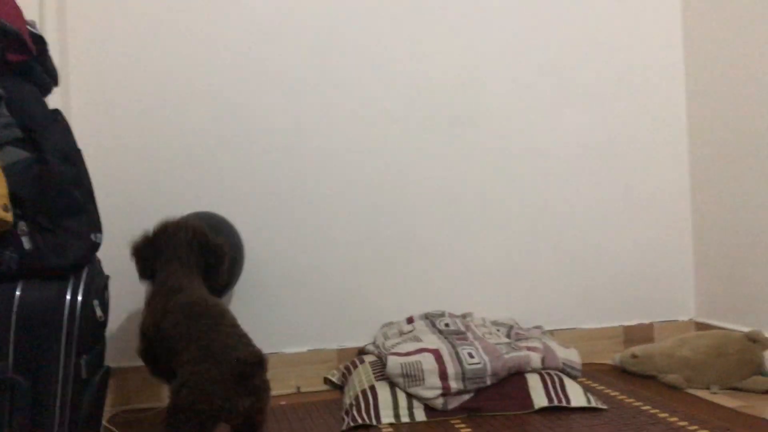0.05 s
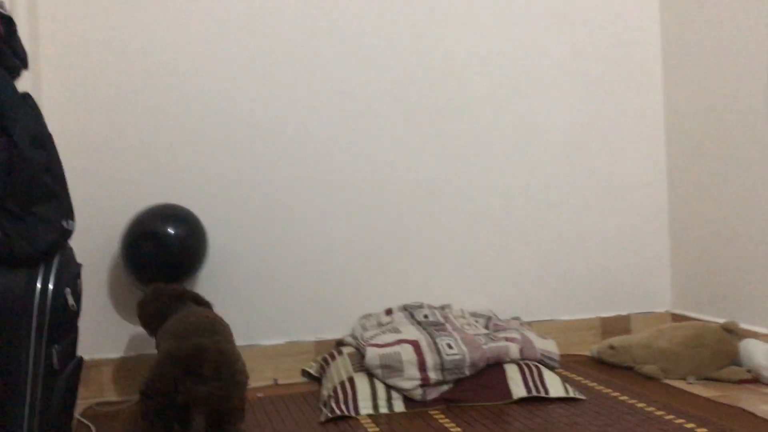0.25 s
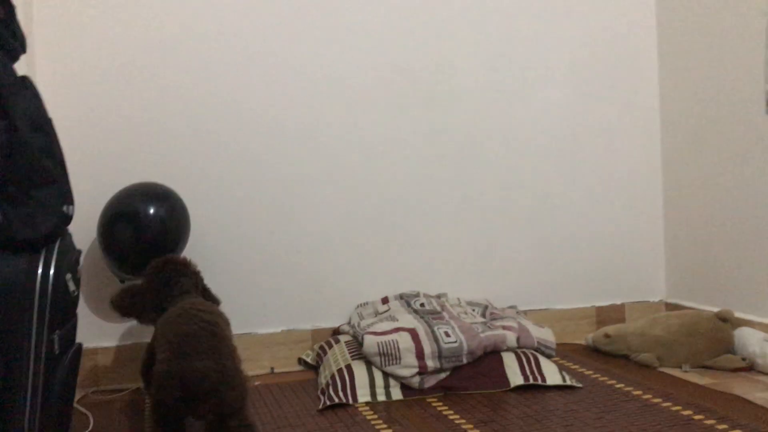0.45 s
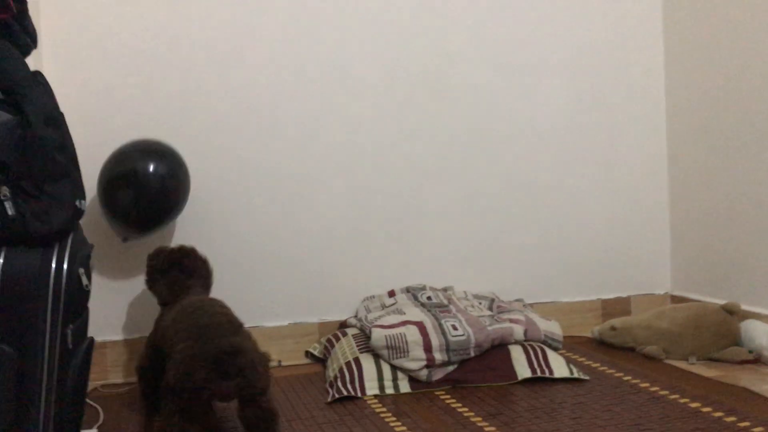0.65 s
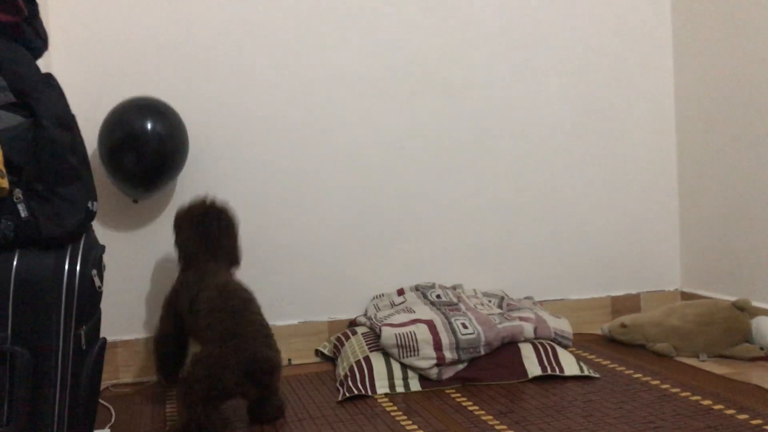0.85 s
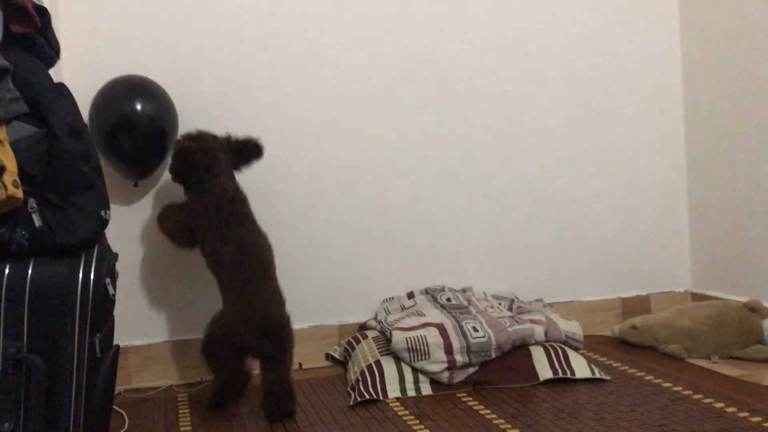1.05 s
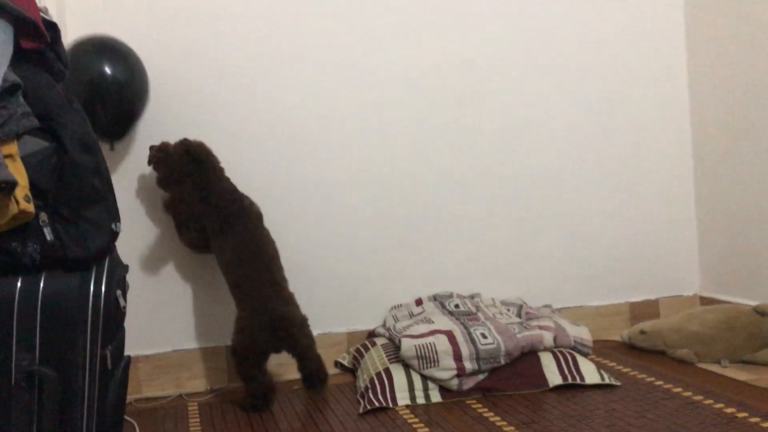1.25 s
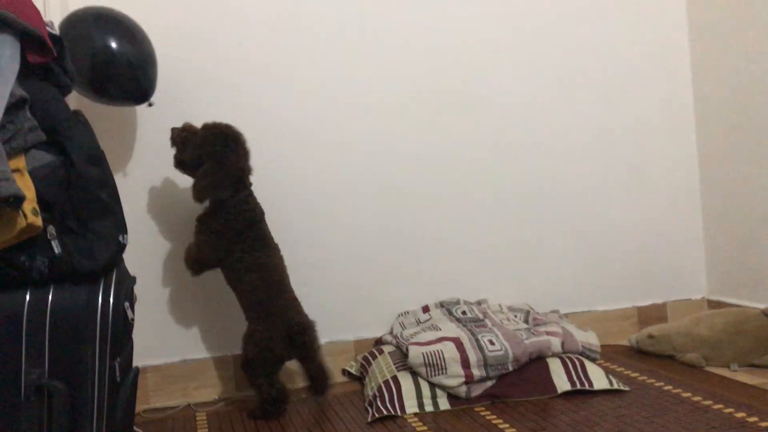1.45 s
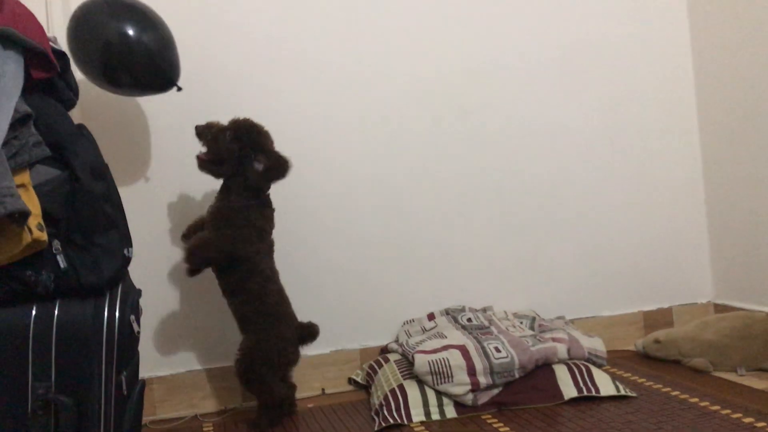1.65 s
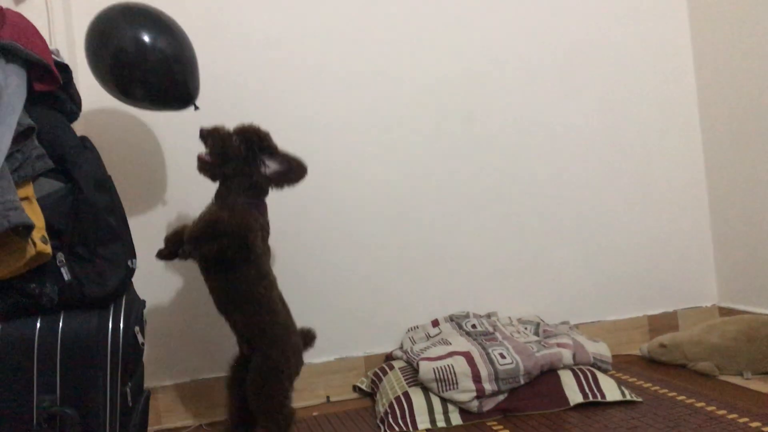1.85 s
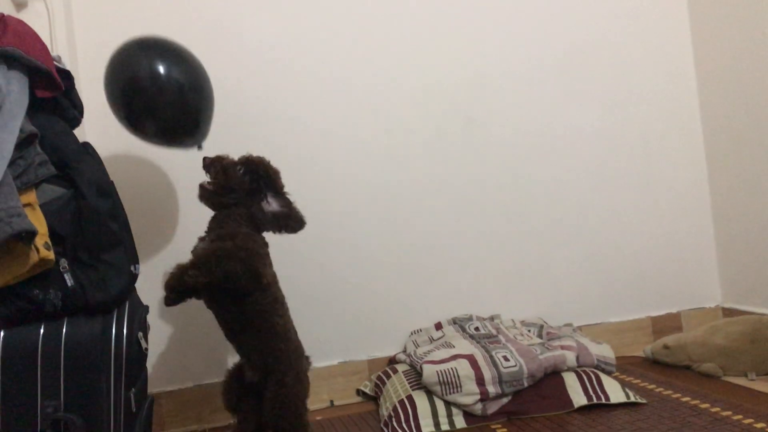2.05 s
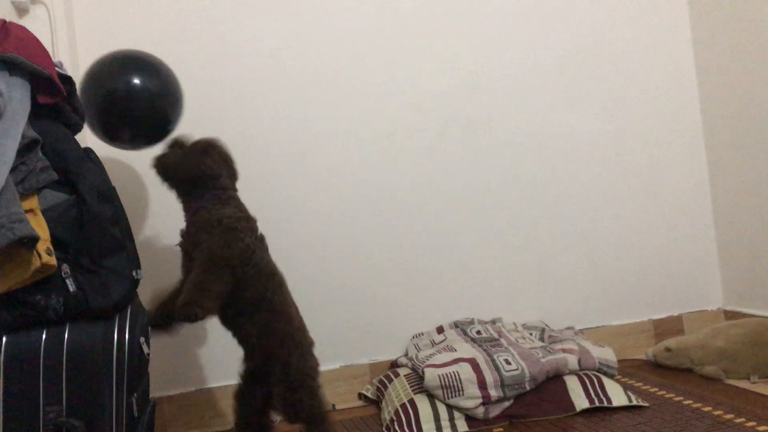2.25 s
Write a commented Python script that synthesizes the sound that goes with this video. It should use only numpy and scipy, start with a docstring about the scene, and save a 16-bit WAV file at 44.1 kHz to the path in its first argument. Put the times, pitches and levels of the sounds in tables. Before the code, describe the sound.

Three high, hoarse barks and a short whine from a small dog jumping indoors.

```python
"""A bare-walled bedroom, the microphone in the room with a small dog jumping at a balloon, over a low hum.
Paws scuff and knock as the first of two shrill barks rings off the near walls; each slides up to a
clear note, then falls hoarsely as the vocal folds turn rough. A short whine follows, and at 1.2 s a
third bark. Faint whistles come and go, and paws tap and scuff through the last half second.
The recorder's gain control ducks at the barks and creeps back."""
import sys
import numpy as np
from scipy import signal
from scipy.fft import rfft, irfft, next_fast_len
from scipy.io import wavfile
from scipy.ndimage import uniform_filter1d, minimum_filter1d

SR = 44100
rng = np.random.default_rng(int(sys.argv[2]) if len(sys.argv) > 2 else 0)


def materialize(psi):
    """Save the field psi as 16-bit PCM at rate SR to the path in sys.argv[1].

    A 1-D psi becomes a single channel; in a 2-D psi each row is a channel.
    """
    bounded = np.clip(np.atleast_2d(psi).T, -1, 1)
    quanta = np.round(bounded * 32767).astype(np.int16)
    wavfile.write(sys.argv[1], SR, quanta)


N = 101429

# the dog's calls at the vocal folds
# (time [s], pitch [Hz], level [dB], roughness [0-1], overtone boost [dB])
FIRST_BARK = [(.209, 590, -18, 0.18, -14), (.224, 658.7, -5, 0.23, -1), (.235, 802.2, -1, 0.35, 9.5),
              (.241, 1083, -4, 0.1, 7.5), (.259, 1110, 5, .04, -22.5), (.267, 1076, 4.5, 1, -1),
              (.276, 1089, 14.5, 0.31, -12), (.3, 978.1, 6, 0.74, -11), (.328, 879.5, 9, .85, -10),
              (.338, 626.4, 6, 0.62, 33), (.362, 622, 7, 0.34, 33.5), (.385, 607, -12, 0.83, 24)]
SECOND_BARK = [(.484, 773.8, -31, 0.11, 6), (.522, 787.5, -12, 0.3, 6), (.55, 898.9, -0.5, 0.16, 22.5),
               (.563, 1051, -1, 0.061, -1), (.581, 1083, 5.5, .3, -2), (.597, 1060, 6.5, 0.85, 2.5),
               (.626, 1102, 8.5, 0.54, 8.5), (.642, 1116, -3, 0.5, 10), (.692, 920.2, 0, 0.85, 17),
               (.76, 946, -11, 0.37, -13)]
SHORT_WHINE = [(.849, 725, -19, .45, -8), (.876, 765, -12, .25, 15), (0.901, 747.5, -16.5, 0.21, 2.5),
               (.925, 690, -12, 0.29, 3)]
THIRD_BARK = [(1.206, 939.6, -16.5, 0.16, 15), (1.233, 915, -5.5, 0.17, 29.5),
              (1.241, 1094, 3, 0.036, -7.5), (1.26, 1096, 8.5, 0.022, -6.5), (1.275, 1125, 9, .22, 5),
              (1.298, 1096, 5.5, 0.99, 9.5), (1.324, 1116, 1.5, 0.44, 19), (1.346, 1102, -6, 0.13, 10),
              (1.36, 967, -2, 0.97, 8), (1.39, 829.6, -3, 0.76, -5), (1.45, 704, -18.5, 0.86, -9)]
# resonances the shape of the mouth adds for a moment in each bark
# (peak time [s], half-length [s], centre [Hz], width [Hz], gain [dB])
FIRST_MOUTH = [(0.328, 0.027, 1264, 240, -9), (0.345, 0.029, 2480, 47, 1.5),
               (0.252, 0.0173, 3320, 200, 8.5)]
SECOND_MOUTH = [(0.66, 0.18, 969, 72, -5), (.61, .06, 1580, 220, -2), (0.702, 0.052, 2550, 360, 1)]
THIRD_MOUTH = [(1.41, 0.043, 670, 160, 8), (1.3, 0.017, 1580, 280, -6), (1.51, 0.13, 2330, 170, 6),
               (1.335, 0.036, 6650, 160, 16.5)]
# resonances of the throat (frequency [Hz], gain [dB])
THROAT_RESPONSE = [(200, -35), (500, -25.5), (700, -14.5), (900, -5), (1080, -2), (1350, 1), (1650, 0.5),
                   (1950, -7.5), (2250, 0), (2700, -2), (3350, -3.5), (4050, -19.5), (4900, -24),
                   (5500, -13.5), (6000, -19.5), (6650, -13), (9000, -18.5), (12000, -22.5), (16000, -43)]
def dog(t):
    """The dog as heard at the muzzle: three barks and a whine, all through the same throat."""
    calls = mouth(t, vocal_folds(t, FIRST_BARK), FIRST_MOUTH)
    calls += mouth(t, vocal_folds(t, SECOND_BARK), SECOND_MOUTH)
    calls += vocal_folds(t, SHORT_WHINE)
    calls += mouth(t, vocal_folds(t, THIRD_BARK), THIRD_MOUTH)
    return colour(calls, THROAT_RESPONSE)


HARMONIC_DB_PER_OCT, AIR_DB, CLEAR_NOTE_AIR = -11.5, -4.5, 0.13
CLEAN_JITTER, ROUGH_JITTER, SHIMMER = 0.0095, 0.0614, 0.48
def vocal_folds(t, call):
    """Smooth folds give clean harmonics; roughness adds jitter, period doubling and pulsed air."""
    times, *columns = np.array(call).T
    pitch, db, rough, overtones_db = (np.interp(t, times, column) for column in columns)
    jitter = (CLEAN_JITTER + ROUGH_JITTER * rough) * wander(rate_hz=420)
    phase = 2 * np.pi * np.cumsum(pitch * (1 + jitter)) / SR
    partial = lambda k: undb(HARMONIC_DB_PER_OCT * np.log2(k)) * np.sin(k * phase)
    clean = partial(1) + undb(overtones_db) * sum(partial(k) for k in range(2, 13))
    clean /= np.hypot(1, undb(overtones_db + HARMONIC_DB_PER_OCT))  # brighter, yet about as loud
    growl = sum(partial(k + .5) for k in range(1, 7))  # halfway between the harmonics
    air = noise([(100, -12), (600, -8), (1000, 0), (16000, -10)])
    air *= 1 + np.cos(phase / 2)  # a puff every second cycle
    folds = clean * (1 - .6 * rough) + rough * growl
    folds *= 1 + SHIMMER * rough * wander(rate_hz=260)
    breath = undb(AIR_DB) * (rough ** 2 + CLEAR_NOTE_AIR) * air
    gate = np.interp(t, [times[0] - .003, times[0], times[-1], times[-1] + .01], [0, 1, 1, 0])
    return gate * undb(db) * (folds + breath)


def mouth(t, voice, resonances):
    """The moving mouth adds resonances that each swell and fade."""
    return voice + sum(undb(db) * ring(voice * np.exp(-((t - at) / length) ** 2), hz, width)
                       for at, length, hz, width, db in resonances)


# paws and balloon brushing wall and bags (time [s], level [dB], attack [s], decay [s])
BRUSHES = [(.2, -41.5, .004, .09), (1.749, -34, 0.0085, 0.0047), (1.808, -39, 0.0039, .016),
           (1.968, -38.5, 0.021, 0.032), (2.29, -45, 0.014, 0.031)]
# sharp ticks: claws striking, and at 0.264 s a crack in the rough first bark (time [s], level [dB])
SHARP_TICKS = [(.196, -29), (0.264, -23.5), (0.872, -33), (1.967, -15.5)]
# paws landing on the mat (time [s], level [dB])
LANDINGS = [(0.273, -31), (1.13, -38.5), (1.254, -38), (1.965, -35.5), (2.037, -41)]
# spectra of the brushes and ticks, and of the landings (frequency [Hz], level [dB])
BRUSH_SPECTRUM = [(300, -15), (1500, 3), (3000, -2), (6000, 0), (9000, 0), (14000, 2), (16000, -6)]
LANDING_SPECTRUM = [(40, -22), (85, 0), (130, -10.5), (200, -6), (350, -10.5), (700, -24), (3000, -47)]
def paws(t):
    """Around the dog: grainy scuffs, sharp ticks, soft landings and a knock."""
    scuffs = sum(undb(db) * burst(t, at, attack, decay) for at, db, attack, decay in BRUSHES)
    scuffs *= undb(3.76 * wander(rate_hz=400))  # the grain
    ticks = sum(undb(db) * strike(t, at, decay_s=0.00049) for at, db in SHARP_TICKS)
    thumps = sum(undb(db) * strike(t, at, decay_s=0.029) for at, db in LANDINGS)
    return knock(t) + (scuffs + ticks) * noise(BRUSH_SPECTRUM) + thumps * noise(LANDING_SPECTRUM)


def knock(t, hz=420, width_hz=350):
    """One hollow knock under the first bark, probably a paw on the balloon."""
    body = ring(rng.standard_normal(N), hz, width_hz)
    body = unit(ring(body, hz, width_hz))
    return undb(-10) * strike(t, at=.272, decay_s=.004) * body


# faint, thin whistles (peak time [s], pitch [Hz], level [dB], decay [s])
NOSE_WHISTLES = [(.56, 14790, -35, 0.074), (1.101, 4470, -43.5, 0.043), (1.13, 14500, -38, 0.035),
                 (1.55, 10300, -49, 0.089), (1.7, 14790, -41, 0.025)]
def whistles(t):
    """Nearly pure, unsteady tones that swell and fade, probably the dog's nose."""
    return sum(undb(db) * burst(t, at, attack_s=0.014, decay_s=decay) * tone(hz, 0.0049, rate_hz=200)
               for at, hz, db, decay in NOSE_WHISTLES)


# the bedroom's reverberation (frequency [Hz], time to fall 60 dB [s])
BEDROOM_DECAY = [(150, 1), (1000, 0.73), (2300, 0.76), (5000, 0.52), (12000, 0.49)]
WALLS_DB, WALLS_DECAY_S, TAIL_DB, REFLECTION_GAP_S = -2, 0.025, -11, 0.0034
def bedroom(t, direct):
    """At the microphone: direct sound, strong echoes off near walls, a tail whose treble dies first."""
    hz, t60s = np.array(BEDROOM_DECAY).T
    spectrum = rfft(rng.standard_normal(N))
    log_hz = np.log(np.arange(len(spectrum)) * SR / N + 1)
    bands = (irfft(spectrum * np.interp(log_hz, np.log(hz), share), N) for share in np.eye(len(hz)))
    tail = sum(band * undb(-60 * t / t60) for band, t60 in zip(bands, t60s))
    walls = rng.standard_normal(N) * np.exp(-t / WALLS_DECAY_S)
    reflections = undb(WALLS_DB) * unit(walls) + undb(TAIL_DB) * unit(tail)
    response = reflections * (t > REFLECTION_GAP_S) / np.sqrt(N)
    return direct + signal.fftconvolve(direct, response)[:N]


# the room's steady noise (frequency [Hz], relative density [dB])
ROOM_SPECTRUM = [(25, -29), (42, -24), (58, -12.5), (90, -2), (130, -8), (200, -7), (400, -18),
                 (1000, -19.5), (2300, -23), (4500, -32.5), (6500, -35), (10000, -41.5), (16000, -44)]
# tones of the hum (frequency [Hz], level [dB])
HUM_TONES = [(59, -41.5), (85, -47), (145, -55), (180, -53.5), (299, -57.5)]
def room_tone():
    """The bedroom behind the dog: low rumble, faint hiss and a wavering hum."""
    hum = sum(undb(db + 1.5 * wander(rate_hz=3.91)) * unit(tone(hz, 0.013, rate_hz=5.94))
              for hz, db in HUM_TONES)
    return undb(-42.5) * noise(ROOM_SPECTRUM) + hum


def duck(x, loudness, ceiling, hold_s, db_per_s):
    """Gain drops at once to keep the loudness under the ceiling, holds, then climbs back."""
    climb_db = db_per_s * np.arange(N) / SR
    allowed_db = np.minimum(0, 20 * np.log10(ceiling / (loudness + 1e-9)))
    hold = int(hold_s * SR) + 1
    held_db = minimum_filter1d(allowed_db, hold, origin=(hold - 1) // 2, mode="nearest")
    gain_db = np.minimum.accumulate(held_db - climb_db) + climb_db
    lookahead = int(.002 * SR)
    return x * undb(uniform_filter1d(minimum_filter1d(gain_db, lookahead), lookahead))


def undb(db):
    """Decibels to gain."""
    return 10 ** (np.asarray(db) / 20)


def unit(x):
    """Scale to rms 1."""
    return x / np.sqrt(np.mean(x ** 2) + 1e-18)


def colour(x, points):
    """Causal filter through points of (frequency [Hz], gain [dB])."""
    hz, db = np.array(points, float).T
    size = 2 * next_fast_len(N)
    log_hz = np.log(np.arange(size // 2 + 1) * SR / size + 1)
    cepstrum = irfft(np.log(undb(np.interp(log_hz, np.log(hz), db))))
    cepstrum[1:size // 2] *= 2  # fold to minimum phase
    cepstrum[size // 2 + 1:] = 0
    return irfft(rfft(x, size) * np.exp(rfft(cepstrum)))[:N]


def ring(x, hz, width):
    """One resonance, gain 1 at its centre."""
    return signal.lfilter(*signal.iirpeak(hz, hz / width, fs=SR), x)


def noise(points):
    """Coloured noise of rms 1."""
    return unit(colour(rng.standard_normal(N), points))


def wander(rate_hz):
    """Random values joined by straight lines; rms 1."""
    return unit(np.interp(np.arange(N) * rate_hz / SR, np.arange(N), rng.standard_normal(N)))


def tone(hz, drift, rate_hz):
    """A sine whose pitch wanders by the fraction `drift`."""
    return np.sin(2 * np.pi * np.cumsum(hz * (1 + drift * wander(rate_hz))) / SR)


def burst(t, at, attack_s, decay_s):
    """Exponential rise to a moment, exponential fall after it."""
    return np.exp(-np.where(t < at, (at - t) / attack_s, (t - at) / decay_s))


def strike(t, at, decay_s):
    """A burst that rises ten times faster than it falls."""
    return burst(t, at, decay_s / 10, decay_s)


def scene():
    """One microphone: dog and paws with the room's echo, room tone and dry whistles."""
    t = np.arange(N) / SR
    return (bedroom(t, dog(t) + paws(t)) + room_tone() + whistles(t))[None]


RMS_WINDOW_S, TOP_HZ = 0.0071, 15900
def record(dry):
    """Behind the microphone: slow-recovering gain control, a fast limiter and a steep low-pass."""
    mic = dry[0]
    rms = np.sqrt(np.abs(uniform_filter1d(mic ** 2, int(RMS_WINDOW_S * SR))))
    ducked = duck(mic, rms, ceiling=0.44, hold_s=0.24, db_per_s=19.5)
    limited = duck(ducked, np.abs(ducked), ceiling=.71, hold_s=0, db_per_s=900)
    lowpass = signal.ellip(8, .2, 80, TOP_HZ, fs=SR, output="sos")
    return signal.sosfilt(lowpass, limited)[None]


dry = scene()
out = record(dry)
materialize(out)
```